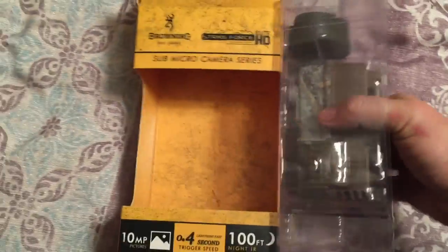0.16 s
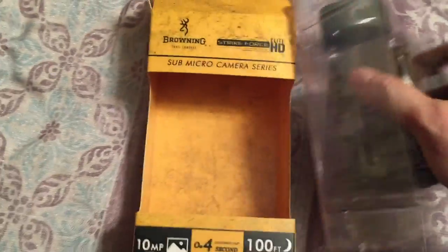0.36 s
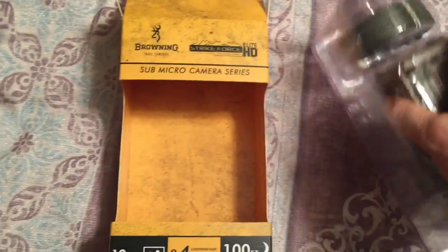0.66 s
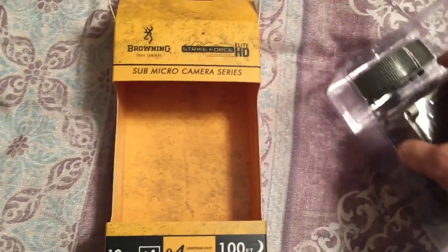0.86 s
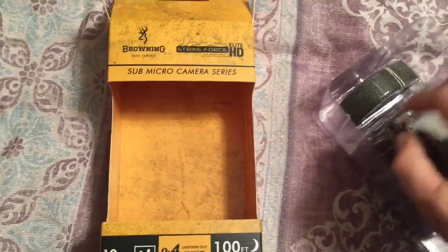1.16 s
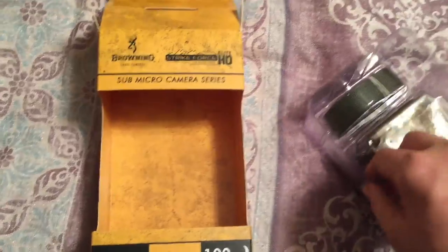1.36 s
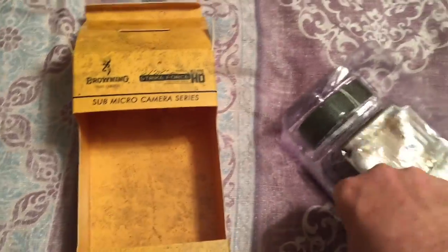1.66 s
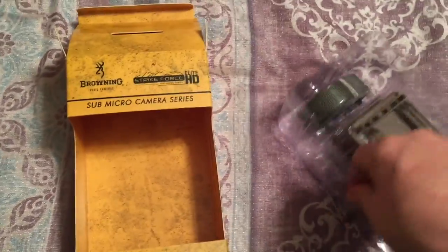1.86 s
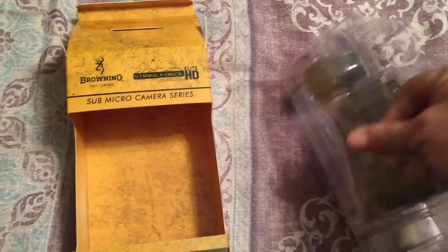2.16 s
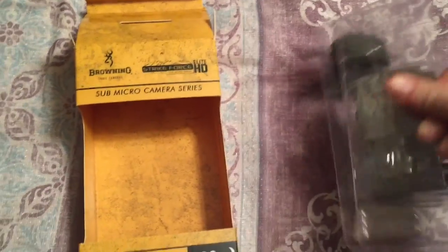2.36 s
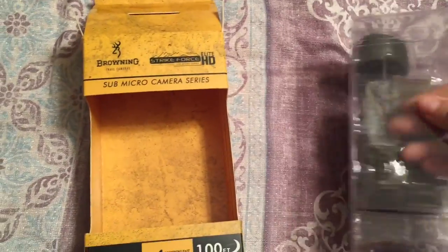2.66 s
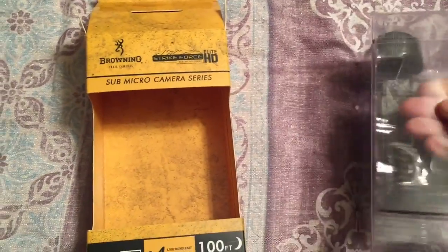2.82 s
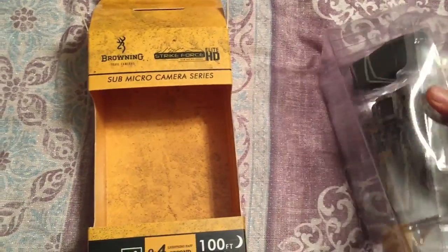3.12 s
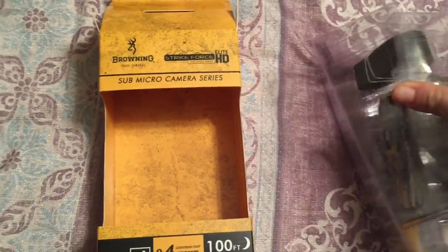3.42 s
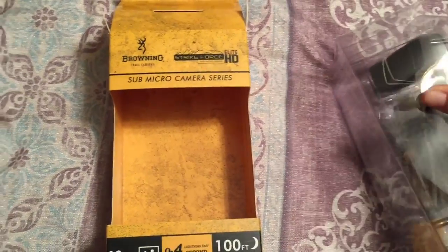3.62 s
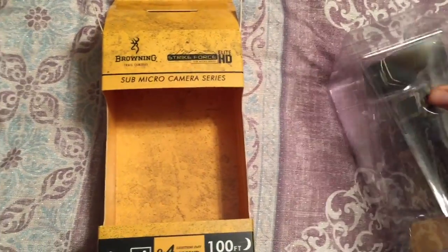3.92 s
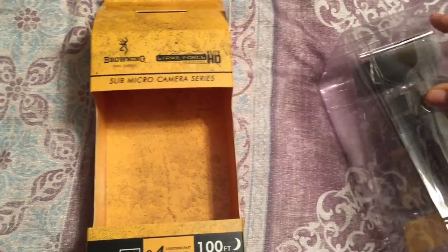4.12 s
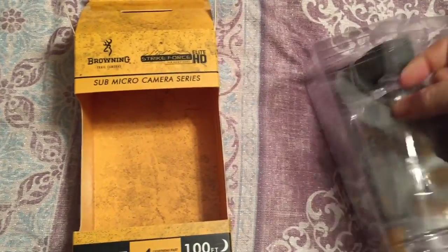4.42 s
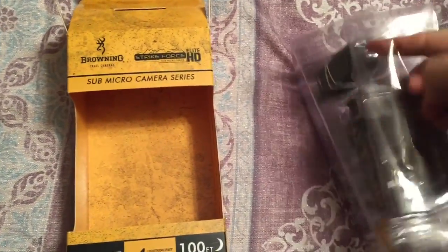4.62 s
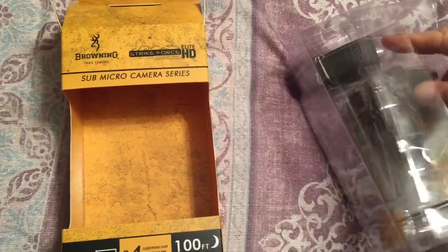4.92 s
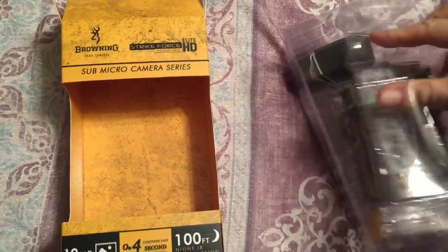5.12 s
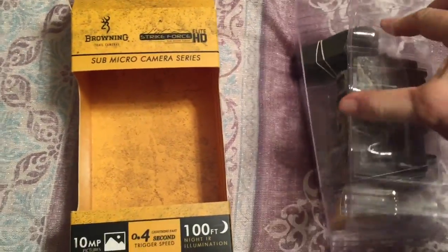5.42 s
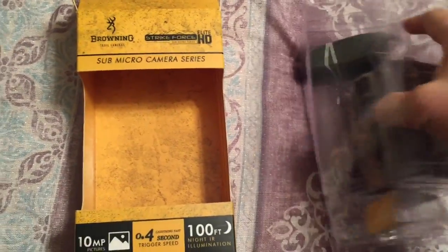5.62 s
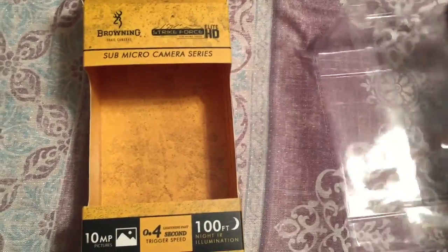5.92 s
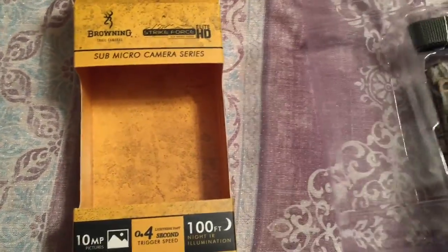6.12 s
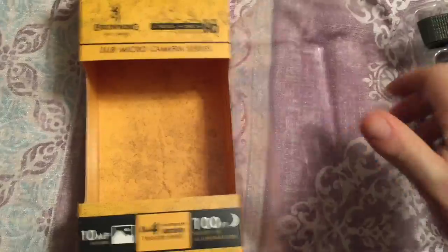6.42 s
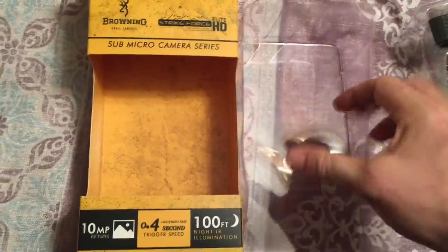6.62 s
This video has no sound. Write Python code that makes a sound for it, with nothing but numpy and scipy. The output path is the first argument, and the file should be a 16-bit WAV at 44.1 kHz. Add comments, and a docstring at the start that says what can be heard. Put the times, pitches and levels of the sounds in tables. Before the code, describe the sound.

Hands work a rigid plastic shell: bright cracks, a quieter spell of small ticks, then dense hollow buckling pops and a last soft rub.

```python
"""Hands pry a stiff clear plastic clamshell apart on a cloth-covered table, close by in a small room. Faint stick-slip
rubbing comes first, then snaps ringing the thin shell from 0.4 s; crease ticks, creaks and swishes, as dispersive waves
or shaped noise, fill a softer stretch from 1.3 s. A hard snap falls near 2.9 s, creaks crowd in after 3 s, and at 3.7 s
the rim ratchets. Buckling pops, with fluttering sheet and booming hollow, crowd 4.4 to 6.5 s; a last rub follows.
A short room tail and steady air noise surround it all, and the microphone clips peaks beyond full scale."""
import sys
import numpy as np
from scipy import signal
from scipy.fft import rfft, irfft
from scipy.io import wavfile
from scipy.ndimage import uniform_filter1d

SR = 44100
rng = np.random.default_rng(int(sys.argv[2]) if len(sys.argv) > 2 else 0)


def dump(signal):
    """Clip the signal to [-1, 1] and save it as 16-bit WAV at the path in sys.argv[1]."""
    limited = np.clip(np.atleast_2d(signal).T, -1, 1)
    pcm = np.round(limited * 32767).astype(np.int16)
    wavfile.write(sys.argv[1], SR, pcm)


N = 298630
RESPONSE_SIZE = 4096  # samples in a response of the shell
POP_WINDOW_S, TICK_WINDOW_S = .01, .005  # a level is the rms of the sound's energy over this time
EVEN_HZ = 1065  # a panel pitched here sounds body and clack alike
CROSSING_S = .0035  # lag of a wave crossing the sheet, two octaves under the treble


def undb(db):
    """Logarithmic level: decibels to amplitude gain."""
    return 10 ** (np.asarray(db) / 20)


def unit(x):
    """Normalization: scale to an rms of one."""
    return x / np.sqrt(np.mean(x ** 2) + 1e-18)


def bins(size):
    """Discrete spectrum: bin frequencies of this many samples, in Hz, at least 1."""
    return np.maximum(np.arange(size // 2 + 1) * SR / size, 1)


def add(out, s, sound):
    """Superposition: mix a sound in at s seconds."""
    start = int(s * SR)
    out[start:start + len(sound)] += sound


def colour(points, f):
    """Spectral envelope: gain along a line of (frequency [Hz], level [dB]) points."""
    hz, db = np.transpose(points)
    return undb(np.interp(np.log(f), np.log(hz), db))


def resonance(f, hz, width, db):
    """Damped oscillator: a resonance that changes the gain at its centre by db."""
    return 1 + (undb(db) - 1) / (1 + 1j * (f * f - hz * hz) / (f * width))


def causal(gain):
    """Minimum phase: the response with this gain that strikes at once and then rings out."""
    cepstrum = irfft(np.log(gain + 1e-6))
    half = len(cepstrum) // 2
    cepstrum[1:half] *= 2
    cepstrum[half + 1:] = 0
    return np.exp(rfft(cepstrum))


def ripple(f, spacing_hz):
    """Modal irregularity: random louder and weaker modes along the spectrum; spread near one."""
    return np.interp(f / spacing_hz, np.arange(len(f)), rng.standard_normal(len(f)))


def walk(rate):
    """Slow random modulation: levels held 1 / rate s and smoothed; rms near one."""
    hold = max(int(SR / rate), 1)
    levels = np.repeat(rng.standard_normal(N // hold + 1), hold)[:N]
    return unit(uniform_filter1d(levels, hold))


def cluster(hz, octaves):
    """High modal density: half a second of noise stands for the many sheet modes around hz; rms one."""
    size = SR // 2
    band = np.exp(-(np.log2(bins(size) / hz) / octaves) ** 2)
    return unit(irfft(rfft(rng.standard_normal(size)) * band, size))


# registers thump, body, clack and tick: (low edge [Hz], high edge [Hz], order of the low skirt)
REGISTERS = [(140, 430, 2), (480, 1000, 5), (1000, 2550, 4), (3450, 16000, 4)]
# resonances of the shell, and a dip below them: (centre [Hz], width [Hz], lift [dB])
SHELL_MODES = [(370, 180, -6.5), (661, 170, 6.5), (1718, 170, 3.5), (4350, 150, 2), (6750, 1200, 2.5)]


def shell(points):
    """Modal resonance: gain of the plastic shell, with its resonances, in each register."""
    f = bins(RESPONSE_SIZE)
    modes = np.prod([resonance(f, *mode) for mode in SHELL_MODES], axis=0)
    gain = colour(points, f) * np.abs(modes)
    return [gain / np.sqrt((1 + (lo / f) ** (2 * skirt)) * (1 + (f / hi) ** 14))
            for lo, hi, skirt in REGISTERS]


def bending(f, travel_s):
    """Dispersion: a bending wave becomes a falling chirp, treble at once and lower notes later."""
    lowest_hz, treble_hz = REGISTERS[0][0], REGISTERS[2][1]
    delay = travel_s * (np.sqrt(treble_hz / np.clip(f, lowest_hz, treble_hz)) - 1)
    return np.exp(-2j * np.pi * np.cumsum(delay) * SR / RESPONSE_SIZE)


# colour of the quiet room: (frequency [Hz], relative level [dB])
AIR_COLOUR = [(20, -20), (70, 5.5), (200, -9.5), (700, -10), (2000, -11.5), (3000, -14), (8000, -19),
              (16000, -29.5)]


def air(level_db=-68):
    """Stationary noise: the faint steady noise of the room."""
    noise = irfft(rfft(rng.standard_normal(N)) * colour(AIR_COLOUR, bins(N)), N)
    return undb(level_db) * unit(noise)


# colour of the room's tail: (frequency [Hz], level [dB])
ROOM_COLOUR = [(60, -10.5), (200, -7.5), (700, -7.5), (1800, -16.5), (4500, -13.5), (8000, -28),
               (16000, -13)]


def room(x, gap_s=0.0036):
    """Reverberation: table and near walls answer within milliseconds and die away in a short tail."""
    t, f = np.arange(SR // 2) / SR, bins(SR // 2)
    edges_hz = [0, 450, 2700, 8000, SR]
    t60_s = [0.07, 0.23, 0.26, 0.091]
    tail = 0
    for lo, hi, t60 in zip(edges_hz, edges_hz[1:], t60_s):
        echoes = rng.standard_normal(len(t)) * np.exp(-np.log(1000) * t / t60) * (t > gap_s)
        band = 1 / np.sqrt((1 + (lo / f) ** 10) * (1 + (f / hi) ** 10))
        tail = tail + rfft(echoes / np.linalg.norm(echoes)) * band
    response = irfft(tail * colour(ROOM_COLOUR, f))[:SR // 3]
    return signal.fftconvolve(x, response)[:N]


def slips(rate, uneven, spread_db):
    """Stick and slip: a click each time the grip lets go, uneven in gap and size; rms one."""
    chance = rng.standard_normal((N // 10, 2))
    gaps = np.exp(uneven * chance[:, 0])
    at = (np.cumsum(gaps) * SR / rate).astype(int)
    sizes = undb(spread_db * np.clip(chance[:, 1], -2, 2)) * rng.choice([-1, 1], len(at))
    return unit(np.bincount(at[at < N], sizes[at < N], N))


def surges(depth_db=2.2, rate=55):
    """Amplitude modulation: sliding plastic catches and runs on, so its rustle swells and breaks; rms one."""
    return unit(undb(depth_db * walk(rate)))


# the resting grip never stops creaking: (thump [dB], body and clack [dB], tick [dB])
HOLD_DB = [-78.5, -65.5, -82.5]
# strokes of skin and plastic rubbing:
# (start [s], length [s], level [dB], weight of the thump [dB], sharpness of the tick [dB])
RUBS = [(.003, 0.31, -50, -4, -14.5), (0.329, 0.19, -47, -15, -1.5), (0.65, 0.26, -47.5, -15, -16.5),
        (1.036, 0.036, -39, -13, -23.5), (1.629, 0.045, -47, -29, -5), (1.778, 0.18, -48.5, -2, -11.5),
        (1.956, 0.33, -46, -6, -9.5), (2.344, 0.096, -48.5, 1.5, -4), (2.591, 0.17, -43.5, -4, -7.5),
        (2.745, 0.35, -44, -7.5, -7), (3.076, 0.23, -39.5, -1, -13.5), (3.338, 0.24, -47.5, -2.5, -16),
        (3.655, 0.13, -44.5, -7, -25), (3.887, 0.19, -45, 0.5, -16.5), (4.278, 0.19, -42.5, 0, -13.5),
        (4.499, 0.36, -40.5, -1.5, -11.5), (4.936, 0.072, -43, -17, -16.5), (4.978, 0.29, -42.5, 1, -12),
        (5.408, 0.074, -42.5, -7.5, -16.5), (5.507, 0.32, -46, 1, -12), (5.73, 0.12, -36.5, 0.5, -9.5),
        (5.907, 0.065, -33.5, -5, -10.5), (6.091, 0.086, -39.5, -8, -11), (6.413, 0.038, -41.5, 8.5, -40.5),
        (6.7, 0.073, -51.5, -4, -2)]


def friction(attack_s=0.0059, sag_db_per_s=12, release_s=0.043):
    """Sliding friction: each stroke takes hold, slackens and lets go over the resting grip, by register."""
    t = np.arange(SR) / SR
    power = np.zeros((3, N + SR)) + undb(HOLD_DB)[:, None] ** 2
    attack = 1 - np.exp(-t / attack_s)
    for s, length_s, db, weight_db, sharp_db in RUBS:
        sag = undb(db - sag_db_per_s * (t - length_s / 2))
        release = np.exp(-np.maximum(t - length_s, 0) / release_s)
        stroke = attack * sag * release
        start = max(int(s * SR), 0)
        power[:, start:start + SR] += np.outer(undb([weight_db, 0, sharp_db]), stroke) ** 2
    return np.sqrt(power[:, :N])


# colour of a rubbing slip: (frequency [Hz], relative level [dB])
SLIP_COLOUR = [(30, 15), (100, 14.5), (700, 8), (2100, 4), (3100, -18), (4000, -12), (7000, -19.5),
               (10000, -26), (16000, -29.5)]


def rubbing(patchy_db=4.0, patchy_rate=70, jerk_s=0.0035):
    """Stick-slip excitation: jerks over a fine sliding grit; the moving contact wakes ever other shell modes."""
    thump, body, clack, tick = shell(SLIP_COLOUR)
    # each jerk scrapes on for a moment before the grip holds again
    jerks = np.abs(slips(rate=90, uneven=.6, spread_db=5))
    scrape = signal.lfilter([1], [1, -np.exp(-1 / (jerk_s * SR))], jerks)
    creak = unit(scrape * rng.standard_normal(N))
    grit = slips(rate=3000, uneven=.8, spread_db=1.5)
    f = bins(RESPONSE_SIZE)
    octaves, travel = np.log2(f), bending(f, CROSSING_S)
    creak_share = [1.1, 1.3, 1.2]  # thump, body and clack, tick
    out = 0
    for gain, strength, share in zip([thump, body + clack, tick], friction(), creak_share):
        force, ring = share * creak + grit, 0
        # half-octave groups of modes swell and fade on their own
        for centre in np.arange(5, 14.5, .5):
            band = gain * np.exp(-((octaves - centre) / .3) ** 2)
            if band.max() > gain.max() / 30:  # weaker groups are left out
                response = np.roll(irfft(band * travel), RESPONSE_SIZE // 2)
                group = signal.oaconvolve(force, response, "same")
                ring = ring + group * undb(patchy_db * walk(patchy_rate))
        # short-time loudness is evened out; the strokes then set the level
        ring = ring / np.sqrt(uniform_filter1d(ring ** 2, SR // 20) + 1e-18)
        out = out + ring * strength
    return out * surges()


# one smooth sheet sliding over the other: (time [s], length [s], centre [Hz], level [dB])
SWISHES = [(2.382, 0.02, 4500, -45), (2.414, 0.042, 5000, -52.5), (2.612, 0.11, 6700, -47.5),
           (2.888, 0.15, 6500, -46.5)]


def swishes(octaves=0.53, crinkle_db=4, crinkle_rate=240):
    """Band noise of sliding contact: a bright, crinkly hiss swells and fades with the speed of the slide."""
    out, t = np.zeros(N + SR), np.arange(SR // 2) / SR
    for s, length_s, hz, db in SWISHES:
        speed = np.sin(np.pi * np.minimum(t / length_s, 1))
        add(out, s, cluster(hz, octaves) * speed * undb(db))
    crinkle = unit(undb(crinkle_db * walk(crinkle_rate)))
    return out[:N] * surges() * crinkle


# plastic gripping plastic: (time [s], length [s], pitch of the ringing panel [Hz], level [dB])
CREAKS = [(0.705, 0.0067, 900, -27.5), (1.677, 0.017, 1900, -36.5), (1.885, 0.02, 1170, -40.5),
          (2.515, 0.03, 1130, -41.5), (3.079, .018, 557, -37), (3.104, 0.023, 2030, -33),
          (3.128, 0.016, 720, -34), (3.176, 0.0086, 1230, -36), (3.203, 0.011, 520, -38),
          (3.234, 0.0053, 470, -37), (3.267, 0.012, 1000, -31.5), (3.288, 0.018, 530, -36),
          (3.527, .024, 1450, -39.5), (4.009, 0.02, 1090, -35), (4.596, 0.0059, 1400, -17.5),
          (5.812, 0.0045, 1000, -32.5), (5.925, 0.0046, 1580, -24), (5.944, 0.0045, 1560, -27.5)]


def creaks(rate=430, uneven=0.36, panel_q=7, panel_db=15, weight_db=-7):
    """Driven resonance: a quick run of slips rings one panel above the rest of the shell."""
    out, f = np.zeros(N + SR), bins(RESPONSE_SIZE)
    thump, body, clack, tick = shell(SLIP_COLOUR)
    response = causal(undb(weight_db) * thump + body + clack + tick) * bending(f, CROSSING_S / 2)
    for s, length_s, hz, db in CREAKS:
        gaps, sizes = np.exp(uneven * rng.standard_normal(size=(2, 64)))
        at = (np.cumsum(gaps) - gaps[0]) / rate
        within = at < length_s
        push = np.bincount((at[within] * SR).astype(int), sizes[within], RESPONSE_SIZE)
        ring = irfft(rfft(push) * response * resonance(f, hz, hz / panel_q, panel_db))
        add(out, s, unit(ring) * undb(db) * np.sqrt(length_s * SR / RESPONSE_SIZE))
    return out[:N]


def ratchet(count=6, start_s=3.701, gap_s=.0115, slowing_s=.0009, db=-33, sharp_db=-25):
    """Periodic impacts: the rim ticks tooth after tooth over its mate, each gap a little longer."""
    return [(start_s + k * gap_s + k * (k - 1) / 2 * slowing_s, db, sharp_db) for k in range(count)]


# small ticks of creases: (time [s], level [dB], sharpness [dB])
TICKS = [(0.2615, -34, -23), (0.3872, -42, 13.5), (0.8011, -36, -12), (0.929, -37, -31),
         (1.0206, -42.5, -24.5), (1.383, -36.5, -25), (1.4042, -42, -7), (1.6452, -37, 5),
         (1.8376, -35.5, -35), (1.8596, -27.5, -17), (1.8791, -34, -2), (2.0425, -55, -10),
         (2.0566, -41.5, -11), (2.0885, -34, -16), (2.1145, -32, -21), (2.1328, -41.5, -26),
         (2.1535, -48, -28), (2.1725, -36.5, -24), (2.1932, -37.5, -21), (2.2112, -34, -15),
         (2.3003, -34, 15), (2.478, -40.5, -21), (2.7294, -31, -5.5), (2.7516, -32, -13),
         (2.7873, -27, -27), (3.0996, -35, -7), (3.1197, -39, -10), (3.252, -29.5, -13),
         (4.1464, -33.5, -19), (4.2907, -36, -7.5), (4.4906, -31, -5), (5.5396, -26, -15),
         (6.5784, -31.5, -9)]


def ticks(ripple_db=6.5, ripple_hz=330, thump_db=-4.5, body_db=-2, scatter=.12, scatter_s=.0022):
    """Dispersive impulse: a small click crosses the sheet as a bending wave, its low notes last."""
    out, f = np.zeros(N + RESPONSE_SIZE), bins(RESPONSE_SIZE)
    t = np.arange(RESPONSE_SIZE) / SR
    thump, body, clack, treble = shell(SLIP_COLOUR)
    # a crease is too small to move the whole shell
    low = unit(np.linalg.norm([undb(thump_db) * thump, undb(body_db) * body, clack], axis=0))
    travel = bending(f, CROSSING_S)
    for s, db, sharp_db in list(TICKS) + ratchet():
        gain = np.hypot(low, undb(sharp_db) * unit(treble))
        response = causal(gain * undb(ripple_db * ripple(f, ripple_hz))) * travel
        # one crisp click and a brief scatter from the nearby creases
        push = scatter * rng.standard_normal(RESPONSE_SIZE) * np.exp(-t / scatter_s)
        push[0] = 1
        ring = unit(irfft(rfft(push) * response))
        add(out, s, ring * undb(db) * np.sqrt(TICK_WINDOW_S * SR / RESPONSE_SIZE))
    return out[:N]


# colour of a snap: (frequency [Hz], relative level [dB])
SNAP_COLOUR = [(30, 1), (100, -4.5), (300, 5.5), (1000, -1), (2100, 3.5), (2900, -6.5), (4000, -4),
               (7000, -11), (10000, -15.5), (16000, -22)]
# thump, body and clack, tick: level against the pop [dB], decay time [s]
SETTLE_DB, SETTLE_S = [-19, -27, -20.5], [0.054, 0.054, 0.037]


def settling(swell_s=0.0032, ripple_db=3, ripple_hz=260, flutter_db=3, flutter_rate=110):
    """Modal decay: after each pop its own choice of the sheet's dense modes swells, flutters and dies away."""
    t, f = np.arange(SR // 2) / SR, bins(RESPONSE_SIZE)
    fades = (1 - np.exp(-t / swell_s)) * np.exp(-t / np.array(SETTLE_S)[:, None])
    thump, body, clack, tick = shell(SNAP_COLOUR)
    gains = [thump, body + clack, tick]
    out = np.zeros((3, N + SR))
    for s, _, _, db, weight_db, sharp_db in POPS:
        for track, gain, fade, register_db in zip(out, gains, fades, [weight_db, 0, sharp_db]):
            uneven = gain * undb(ripple_db * ripple(f, ripple_hz))
            modes = np.interp(bins(len(t)), f, uneven)
            ring = unit(irfft(rfft(rng.standard_normal(len(t))) * modes, len(t)))
            add(track, s, ring * fade * undb(db + register_db))
    return sum(track[:N] * undb(db + flutter_db * walk(flutter_rate)) for track, db in zip(out, SETTLE_DB))


# boom of the package under each pop: (pitch before variation [Hz], level against the thump [dB])
HOLLOW = [(180, -8), (300, -8.5)]


def hollow(sag=0.29, sag_s=0.013, ring_s=0.02, vary=.13):
    """Cavity resonance: a pop's bulge stiffens the hollow package; as it relaxes, its boom settles in pitch."""
    out, t = np.zeros(N + SR), np.arange(SR // 4) / SR
    relaxing = t + sag * sag_s * (1 - np.exp(-t / sag_s))
    for s, _, _, db, weight_db, _ in POPS:
        for hz, mode_db in HOLLOW:
            varied_hz = hz * np.exp(vary * rng.standard_normal())  # each boom mode varies a little in pitch
            boom = np.sin(2 * np.pi * varied_hz * relaxing) * np.exp(-t / ring_s)
            add(out, s, undb(db + weight_db + mode_db) * boom)
    return out[:N]


# a few separate modes of panel and rim in hard snaps: (time [s], [(mode [Hz], level [dB]), ..])
ZINGS = [(.4308, [(1750, -23.5), (4150, -23.5), (6500, -18), (8400, -28)]), (.5355, [(720, -17),
         (2250, -23.5), (2700, -31)]), (.7268, [(780, -25), (1720, -32), (3750, -21.5)]),
         (1.0742, [(850, -14.5), (1120, -8.5), (3100, -23.5)]), (2.8968, [(690, -20.5), (1250, -15.5),
         (1750, -22.5)]), (5.3272, [(440, -18.5), (1900, -15.5), (4300, -19.5)])]


def zings(ring_s=0.0029, octaves=0.48, tail_db=-33, tail_s=0.037):
    """Free vibration: each mode of a hard snap rings a few cycles, then lingers softly in its neighbours."""
    out, t = np.zeros(N + SR), np.arange(SR // 2) / SR
    for s, modes in ZINGS:
        for hz, db in modes:
            decay_s = ring_s * np.sqrt(EVEN_HZ / hz)  # high modes die sooner
            ring = np.sin(2 * np.pi * hz * t) * np.exp(-t / decay_s)
            # a small panel radiates little far below its mode
            ring = signal.sosfilt(signal.butter(2, hz / 2, "high", fs=SR, output="sos"), ring)
            tail = cluster(hz, octaves) * undb(tail_db) * np.exp(-t / tail_s)
            add(out, s, unit(ring + tail) * undb(db) * np.sqrt(POP_WINDOW_S * SR / len(t)))
    return out[:N]


# pops of the shell's panels: (time [s], pitch of the flipping panel [Hz], rattle time before the
# register's share [s], level [dB], weight of the thump [dB], sharpness of the tick [dB])
POPS = [(.201, 590, 0.0037, -35.5, -15.5, -17), (0.396, 1030, 0.0034, -23, -32.5, -8.5),
        (0.4303, 950, 0.0024, -18, -15, -1.5), (0.535, 540, 0.0045, -21, -6, -9.5),
        (0.726, 1130, 0.003, -18, -19.5, -6), (1.0733, 1130, 0.0021, -14.5, -15, -12),
        (1.124, 1290, 0.0026, -14.5, -11, -6.5), (1.3345, 1466, 0.0059, -35, -12, -7),
        (1.346, 1316, 0.029, -31.5, -1.5, -13.5), (1.687, 855, 0.017, -34, -37, -9),
        (2.0056, 800, 0.016, -28, -13, -18), (2.228, 950, 0.017, -28.5, -14, -19),
        (2.762, 304, 0.0047, -30.5, -1, -26), (2.8225, 780, 0.0029, -28, -6.5, -35),
        (2.8605, 1600, 0.00079, -21, -37, -4.5), (2.896, 1420, 0.0026, -9.5, -16, -11.5),
        (3.3389, 965, 0.0017, -16, -14.5, -22), (3.4403, 330, 0.0022, -21, 5, -35),
        (3.5914, 1145, 0.0027, -18.5, -2, -17), (3.7793, 765, 0.0096, -25.5, 2, -34),
        (3.9172, 547, 0.00079, -24.5, -1.5, -54), (3.929, 895, 0.0044, -31.5, -25, -3.5),
        (4.0137, 604, 0.015, -29, 4, -29), (4.167, 627, 0.014, -33, -3, -23),
        (4.3861, 1200, 0.00071, -25.5, -7, -15), (4.389, 435, 0.004, -21, -2.5, -21.5),
        (4.557, 296, 0.01, -25.5, 3, -15.5), (4.593, 1360, 0.0045, -28, 6.5, -37),
        (4.6618, 650, 0.0011, -19.5, -21, -15.5), (4.6761, 1400, 0.0048, -21, 0.5, -14),
        (4.7273, 650, 0.0034, -15, -11, -5.5), (4.756, 1560, 0.0056, -12, -5, -7.5),
        (4.7608, 665, 0.0036, -16.5, -16, -20), (5.0231, 1520, 0.0016, -16, -12.5, -11.5),
        (5.0642, 585, 0.004, -26.5, -1, -17.5), (5.191, 290, 0.015, -22, -1, -33),
        (5.2339, 1610, 0.0028, -13.5, -17, -10.5), (5.3265, 980, 0.0045, -14.5, -7.5, 0),
        (5.332, 940, 0.007, -14.5, -17, -25), (5.34, 580, 0.0027, -18, -3, -29),
        (5.5158, 1440, 0.0044, -24.5, -1.5, -26), (5.5665, 695, 0.0093, -24, -4.5, -50),
        (5.58, 870, 0.02, -25.5, -3.5, -51), (5.6213, 527, 0.0036, -24, -2, -39),
        (5.7221, 730, 0.0049, -16.5, -12.5, -22), (6.0807, 665, 0.0067, -18.5, -11.5, -22.5),
        (6.121, 1260, 0.0058, -28, -8, -7), (6.235, 1170, 0.0029, -24.5, -9, -5),
        (6.4198, 1345, 0.013, -31, -6, -15), (6.433, 600, 0.0072, -24, -21.5, -21),
        (6.524, 1170, 0.0026, -18.5, -6.5, -8.5), (6.531, 580, 0.0045, -15, -17.5, -17),
        (6.538, 607, 0.0044, -14.5, -5, -21)]


def pops(panel_db=6.5, panel_q=7.2, near_db=9, near_octaves=1.0, ripple_db=4.0, ripple_hz=170,
         after_db=-25, after_s=0.02, strain_db=-15, strain_s=0.0011, under_db=9, travel_s=0.00067,
         clack_db_per_octave=10):
    """Snap-through buckling: a panel strains, cracks and rattles; returns direct and all-round sound."""
    out, f = np.zeros((2, N + RESPONSE_SIZE)), bins(RESPONSE_SIZE)
    lead = RESPONSE_SIZE // 8  # samples of strain before the crack
    t = (np.arange(RESPONSE_SIZE) - lead) / SR
    strain = undb(strain_db) * np.exp(-np.abs(t) / strain_s)
    after = undb(after_db) * np.exp(-np.abs(t) / after_s)
    responses = [causal(gain) for gain in shell(SNAP_COLOUR)]
    travel = bending(f, travel_s)
    lasting = [1.0, 0.94, 1.0, 0.31]  # the tick dies first
    cracks = [1.2, 1.0, 0.55, 0.058]  # the low registers feel one push, the high ones many small ones
    for s, panel_hz, rattle_s, db, weight_db, sharp_db in POPS:
        panel = resonance(f, panel_hz, panel_hz / panel_q, panel_db)
        # every spot wakes its own choice of modes, most of all those near the panel's pitch
        near = np.exp(-(np.log2(f / panel_hz) / near_octaves) ** 2)
        spot = causal(undb(ripple_db * ripple(f, ripple_hz) + near_db * near))
        # a panel radiates less and less through the octaves below its pitch, down to the thump
        under = np.maximum(np.log2(panel_hz / np.maximum(f, REGISTERS[0][1])), 0)
        spot = spot * causal(undb(-under_db * under))
        start = int(s * SR) - lead
        # small high panels clack, large low ones sound the body
        lean = np.arctan(undb(clack_db_per_octave * np.log2(panel_hz / EVEN_HZ)))
        gains = [undb(weight_db), np.cos(lean), np.sin(lean), undb(sharp_db)]
        for response, share, crack, gain in zip(responses, lasting, cracks, gains):
            rattle = np.exp(-np.abs(t) / max(rattle_s * share, 1e-4))
            push = rng.standard_normal(RESPONSE_SIZE) * np.where(t < 0, strain, rattle + after)
            push[lead] += crack * np.linalg.norm(push)
            direct = unit(irfft(rfft(push) * response * spot * panel * travel))
            # the sum of all directions is smoother, and fills the room
            spread = unit(np.roll(irfft(response * spot), lead))
            size = gain * undb(db) * np.sqrt(POP_WINDOW_S * SR / RESPONSE_SIZE)
            out[:, start:start + RESPONSE_SIZE] += size * np.array([direct, spread])
    return out[:, :N]


def scene(rub_wet_db=-3):
    """Direct and reverberant field: pops and handling, near and through the room, at one microphone."""
    direct, spread = pops()
    handling = rubbing() + swishes() + creaks() + ticks() + settling() + hollow() + zings()
    reverberant = room(spread + undb(rub_wet_db) * handling)
    return (direct + handling + reverberant + air())[None]


def record(dry, top_hz=16000):
    """Overload and band limiting: the microphone clips peaks beyond full scale and cuts the top."""
    lowpass = signal.ellip(12, .2, 90, top_hz, fs=SR, output="sos")
    return signal.sosfilt(lowpass, np.clip(dry, -1, 1))


dry = scene()
out = record(dry)
dump(out)
```